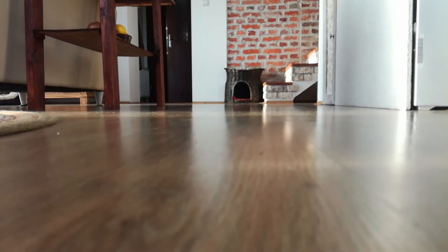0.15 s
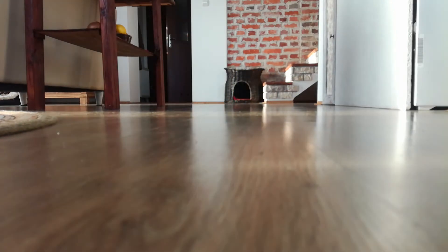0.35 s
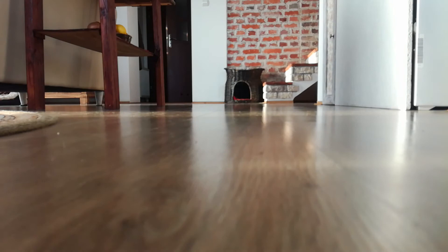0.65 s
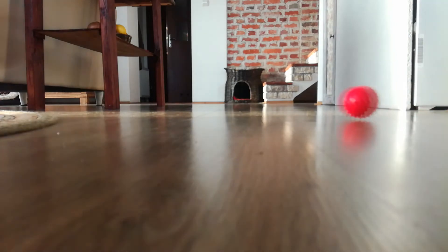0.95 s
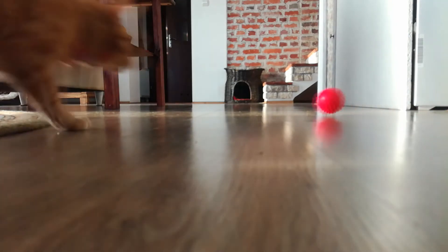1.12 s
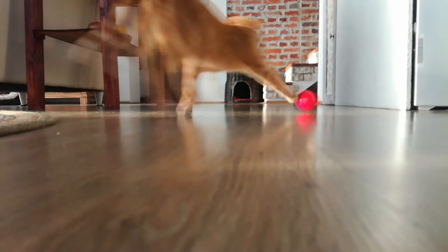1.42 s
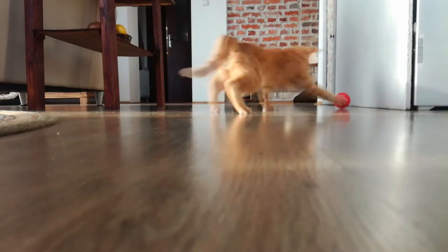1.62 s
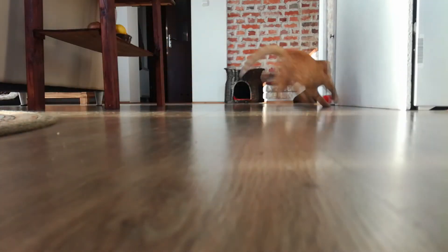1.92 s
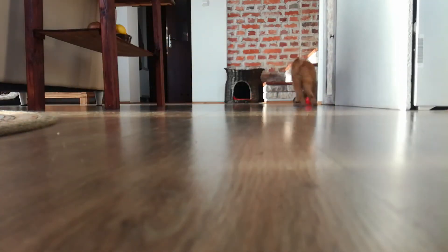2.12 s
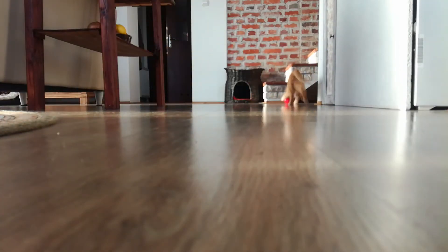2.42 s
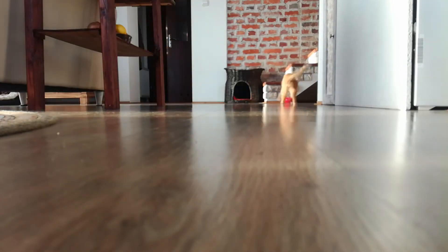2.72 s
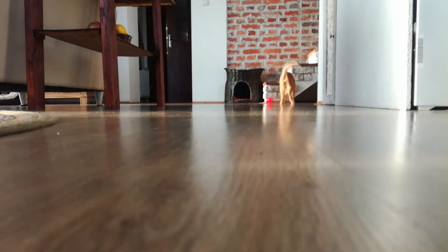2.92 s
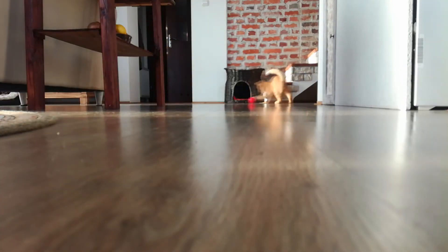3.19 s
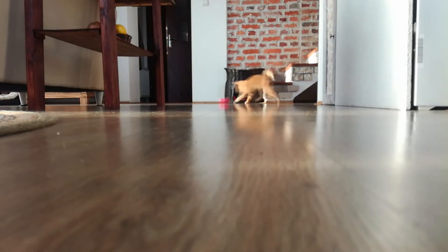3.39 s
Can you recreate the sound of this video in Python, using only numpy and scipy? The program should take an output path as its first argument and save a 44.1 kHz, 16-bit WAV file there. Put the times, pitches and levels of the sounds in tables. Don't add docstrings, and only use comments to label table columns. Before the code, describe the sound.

Hollow plastic ball with knobs clatters rapidly over floorboards, chased by a cat, fading into room echo

```python
import sys
import numpy as np
from scipy import signal
from scipy.fft import rfft, irfft
from scipy.io import wavfile

SR = 44100
rng = np.random.default_rng(int(sys.argv[2]) if len(sys.argv) > 2 else 0)


def volts(x):
    e = np.asarray(x, float) / 20
    return 10 ** e


def transcribe(signal):
    frames = np.atleast_2d(signal).T
    limited = np.clip(frames, -1, 1)
    pcm = np.round(limited * 32767).astype(np.int16)
    wavfile.write(sys.argv[1], SR, pcm)


N = 156555

# start_s, click_peak_db, thud_db, thud_pitch_hz
NEAR_TAPS = [(0.2189, -28.5, -25.5, 634), (0.2438, -35, -34.5, 613), (0.2503, -44, -34.5, 634),
             (0.2716, -43, -31.5, 690), (0.2925, -36, -27.5, 610), (0.3241, -38, -29, 543),
             (0.3305, -39, -46, 513), (0.3434, -37, -31.5, 620), (0.3786, -38, -33.5, 616),
             (0.3876, -27, -28.5, 640), (0.4244, -32.5, -36.5, 616), (0.4554, -33.5, -30.5, 625),
             (0.4917, -36, -32.5, 520), (0.5197, -36, -30.5, 689), (0.5484, -31.5, -27, 517),
             (0.6006, -28, -30, 535), (0.6233, -38, -47.5, 546), (0.6398, -25.5, -34.5, 503),
             (0.6623, -26, -31, 463), (0.7024, -24, -26, 525), (0.7233, -31, -41, 544),
             (0.7425, -31, -25.5, 538), (0.7866, -36, -30, 520), (0.8096, -39, -34, 505),
             (0.833, -29, -33, 533), (0.8788, -35, -33.5, 470), (0.9098, -27.5, -27.5, 480)]
# multiple_of_thud_pitch, level_db, t60_s
THUD_PARTS = [(1.002, 0, 0.018), (1.298, -10, 0.027), (1.8, -15.5, 0.012)]


def in_time(rows):
    s, *columns = np.transpose(rows)
    return [np.interp(np.arange(N) / SR, s, c) for c in columns]


def after_landing():
    return np.arange(N) > NEAR_TAPS[0][0] * SR


def at_hz(points, hz):
    points_hz, points_db = np.transpose(points)
    return np.interp(np.log(hz + 1), np.log(points_hz), points_db)


def colour(x, points, scale=1):
    hz = np.fft.rfftfreq(x.shape[-1], 1 / SR)
    return irfft(rfft(x) * volts(scale * at_hz(points, hz)), x.shape[-1])


def band(x, low_hz, high_hz):
    return signal.sosfilt(signal.butter(2, [low_hz, high_hz], "band", fs=SR, output="sos"), x)


def rms_one(x):
    return x / np.sqrt(np.mean(x ** 2) + 1e-20)


def ring(clicks, hz, t60):
    r, w = volts(-60 / (t60 * SR)), 2 * np.pi * hz / SR
    return signal.lfilter([0, np.sin(w)], [1, -2 * r * np.cos(w), r * r], clicks + 1e-18)


def add(out, s, sound):
    i = int(s * SR)
    out[i:i + len(sound)] += sound[:len(out) - i]


def blow(modes, spread_db, size=2000):
    click = np.zeros(size)
    click[0] = 1
    out = np.zeros(size)
    for hz, db, t60 in modes:
        strength, detune = rng.normal(0, 1, 2)
        out += volts(db + spread_db * strength) * ring(click, hz * (1 + .025 * detune), t60)
    return out


def grains(per_s, uneven_db):
    sizes = volts(uneven_db * np.minimum(rng.exponential(1, N), 4)) * rng.choice([-1, 1], N)
    return sizes * (rng.random(N) < per_s / SR)


def hush():
    # pitch_hz, level_db
    spectrum = [(15, -37), (60, 10.5), (335, 7.5), (714, 3.5), (1500, 4), (2200, -0.5), (9000, -5),
                (15700, -10.5)]
    air = rng.standard_normal((2, N))
    ports = np.array([air[0], .7 * air[0] + .7 * air[1]])
    return volts(-70.5) * rms_one(colour(ports, spectrum))


def stirs():
    # start_s, peak_db, pitch_hz
    catches = [
        (.084, -65.5, 800),
        (.153, -67.5, 1500),
        (0.198, -65, 690),
        (1.697, -35.5, 2220),
        (1.698, -39.5, 2750),
        (3.166, -37.5, 1750),
        (3.249, -40, 1500),
        (3.278, -47, 2220),
    ]
    out = np.zeros(N)
    for s, db, hz in catches:
        add(out, s, volts(db) * blow([(hz, 0, .022), (hz * 1.17, -4, .015)], spread_db=1.0))
    return band(out, 123, 9700)


def taps():
    # start_s, click_peak_db, thud_db, thud_pitch_hz
    mid_taps = [(0.9707, -26, -24, 500), (1.0321, -31.5, -27.5, 584), (1.0914, -34.5, -30.5, 544),
                (1.1317, -31, -32.5, 510), (1.1501, -47, -32, 571), (1.1711, -28.5, -30.5, 520),
                (1.2445, -23.5, -28.5, 550), (1.2735, -29.5, -44, 630), (1.2804, -34, -32, 590),
                (1.3147, -26, -34, 507), (1.3647, -32.5, -30, 528), (1.4077, -44, -39, 563),
                (1.421, -24.5, -34.5, 625), (1.4248, -33, -34, 458), (1.4356, -58, -28.5, 434),
                (1.4707, -32.5, -27.5, 523), (1.4834, -47, -31.5, 674)]
    # start_s, thud_peak_db, thud_pitch_hz, click_db
    far_taps = [(1.604, -38.5, 493, -61), (1.635, -37, 530, -59), (1.673, -36, 575, -63),
                (1.716, -23.5, 396, -76), (1.777, -50, 485, -63), (1.829, -35, 400, -60),
                (1.874, -35, 554, -58), (1.924, -42, 450, -66), (1.961, -36.5, 458, -57),
                (1.997, -38.5, 474, -64), (2.032, -38.5, 463, -54.5), (2.075, -32.5, 456, -60),
                (2.119, -30.5, 454, -54), (2.164, -28.5, 670, -55), (2.23, -21.5, 483, -46),
                (2.273, -24.5, 477, -55), (2.317, -23.5, 510, -50), (2.402, -31.5, 533, -73),
                (2.426, -30, 636, -62), (2.491, -34, 480, -60), (2.505, -30.5, 480, -53),
                (2.521, -27.5, 605, -64), (2.544, -25.5, 720, -55), (2.564, -34, 560, -68),
                (2.585, -31, 412, -62), (2.631, -39, 417, -62), (2.688, -31.5, 384, -57),
                (2.723, -29, 402, -60), (2.828, -40, 395, -62), (2.915, -33, 450, -62),
                (2.934, -33.5, 580, -58), (2.958, -43, 557, -52), (3.004, -30.5, 585, -62),
                (3.029, -27.5, 573, -60), (3.059, -41, 603, -69), (3.087, -35.5, 566, -67),
                (3.109, -35.5, 568, -54), (3.126, -24.5, 587, -54), (3.148, -28, 562, -59),
                (3.169, -37, 565, -55), (3.199, -31.5, 618, -56), (3.274, -35, 650, -42.5),
                (3.301, -31.5, 683, -53), (3.362, -31, 575, -56)]
    # pitch_hz, level_db
    shell = [(700, 13), (1700, 12), (3200, 7.5), (4500, 8.5), (6300, 0.5), (8200, 2), (11000, -9),
             (16000, -14)]
    # pitch_hz, level_db, t60_s
    shell_modes = [(3000, -3, .005), (4250, -2, .005), (5200, -6, .004)]
    thud_gain_db, click_gain_db, shell_ring_db = 3, 2, -9.5
    delay_s, click_s, click_smear = .001, .0009, 2.2
    far = [(s, click_db + 14.5, db - 0.5 - thud_gain_db, hz) for s, db, hz, click_db in far_taps]
    near_thuds, far_thuds = np.zeros((2, N))
    cracks = np.zeros((3, 2, N))
    t = np.arange(300) / SR
    for zone, rows in enumerate([NEAR_TAPS, mid_taps, far]):
        thuds = far_thuds if zone == 2 else near_thuds
        ringing = 2.34 if zone == 2 else 1
        fade = np.exp(-t / (click_s * click_smear ** zone))
        for s, click_db, thud_db, hz in rows:
            thud = blow([(hz * m, db, t60 * ringing) for m, db, t60 in THUD_PARTS], spread_db=1.0)
            add(thuds, s + delay_s, volts(thud_db + thud_gain_db) * thud)
            for port in cracks[zone]:
                puff = rng.standard_normal(len(t)) * fade
                shell_ring = volts(shell_ring_db - 12) * blow(shell_modes, spread_db=5.5, size=300)
                crack = puff / np.linalg.norm(puff) + shell_ring
                add(port, s + delay_s, volts(click_db + click_gain_db) * crack)
    dulled = band(cracks[1], 1700, 6500) + band(cracks[2], 4100 * .7, 4100 * 1.2)
    blunt = band(near_thuds, 102, 1120) + band(far_thuds, 319, 800)
    return band(blunt, 360, 1310) + colour(cracks[0] + dulled, shell)


def roll():
    # time_s, level_db
    rumble = [(.22, -52), (1.52, -40.5), (1.57, -52.5), (2.2, -42.5), (2.35, -38.5), (2.47, -50.5),
              (2.53, -39.5), (2.7, -47), (2.88, -42), (3.18, -42.5), (3.3, -52), (3.55, -44.5)]
    body = np.zeros(N)
    for hz in (440, 560, 680):
        for multiple, db, t60 in THUD_PARTS:
            body += volts(db) * ring(grains(500, 0.72), hz * multiple, t60)
    return volts(in_time(rumble)[0] - 3.5) * rms_one(band(body, 231, 1860)) * after_landing()


def scuffs():
    # time_s, level_db
    strength = [(.22, -80), (.65, -64), (1.22, -64), (1.4, -58.5), (1.425, -55.5), (1.58, -61.5),
                (1.69, -63.5), (1.71, -52.5), (1.9, -63.5), (2.225, -60.5), (2.235, -52.5), (2.45, -58),
                (2.9, -65), (3.0, -54), (3.09, -68), (3.18, -50), (3.3, -55), (3.55, -60)]
    # pitch_hz, level_db
    claw_colour = [(600, -3), (1300, 2), (2500, -11), (4500, -13), (6500, -18), (8100, -17), (10000, -28.5),
                   (16000, -34)]
    grit = rms_one(colour(np.array([grains(3500, 2.5) for _ in range(2)]), claw_colour))
    since_closest_s = np.arange(N) / SR - 1.425
    airy_db = 2.5 + np.minimum(20.5 * since_closest_s, -68 * since_closest_s)
    airy = volts(airy_db) * band(grit, 3730, 15800)
    return volts(in_time(strength)[0] + 3) * (grit + airy) * after_landing()


def paws():
    # time_s, level_db
    weight = [(.2, -70.5), (.6, -59.5), (1.2, -63.5), (1.43, -52.5), (1.55, -65.5), (1.75, -49.5),
              (2.0, -69), (2.2, -64), (2.25, -55), (2.36, -62), (2.95, -63.5), (3.55, -85)]
    # pitch_hz, level_db
    floor_modes = [(84, 0.5), (154, -7.5), (225, 3.5)]
    shake = sum(volts(db) * ring(grains(60, 0.76), hz, 0.035) for hz, db in floor_modes)
    return volts(in_time(weight)[0] - 0.5) * rms_one(band(shake, 80, 265)) * after_landing()


def bell():
    # start_s, length_s, level_db
    shakes = [(0.665, 0.0064, -45), (0.737, 0.006, -51.5), (0.784, 0.011, -57), (1.029, 0.019, -51.5),
              (1.052, .06, -66), (1.207, 0.15, -67.5), (1.348, 0.045, -71), (1.599, 0.084, -70),
              (1.657, 0.062, -70.5), (1.785, 0.063, -64.5), (1.918, 0.16, -63.5), (2.123, 0.22, -67),
              (2.475, 0.074, -65), (2.652, 0.039, -70), (2.892, 0.098, -61), (2.917, 0.32, -67),
              (3.226, 0.079, -65.5), (3.415, 0.026, -52)]
    # pitch_hz, level_db, t60_s
    bell_modes = [(8100, 0, .025), (8230, -3, .022), (7850, -11, .014), (7400, -13, .012),
                  (6950, -14, .012)]
    gain_db, fade_db, pellet_per_s = 6, 4, 1300
    force = np.zeros(N)
    for s, length, db in shakes:
        fading = fade_db * np.linspace(0, 1, int(length * SR))
        add(force, s, volts(db + gain_db - fading))
    hits = [grains(pellet_per_s, 0.91) for _ in range(2)]
    main_hz, _, main_t60 = bell_modes[0]
    steady = ring(hits[0], main_hz, main_t60)
    out = np.zeros(N)
    for k, (hz, db, t60) in enumerate(bell_modes):
        out += volts(db) * ring(force * hits[k % 2], hz, t60)
    return band(out / np.sqrt(np.mean(steady ** 2) + 1e-20), 6400, 9200)


def knocks():
    # start_s, level_db
    hits = [
        (1.699, -17),
        (1.716, -15.5),
        (1.75, -18),
        (1.791, -23.5),
    ]
    # pitch_hz, level_db, t60_s
    panel = [(80, -8.5, 0.12), (155, -5.5, 0.2), (201, -0.5, 0.098), (247.4, -1.5, 0.11), (370, -7.5, 0.11),
             (477, -5, 0.066), (602, -8, 0.079), (987, -9.5, 0.028)]
    out = np.zeros(N)
    for s, db in hits:
        add(out, s, volts(db - 13.5) * blow(panel, spread_db=0.0, size=12000))
    return band(out, 123, 9700)


def room(x):
    # pitch_hz, t60_s
    decay = [(100, 0.28), (500, 0.7), (8000, 0.053), (16000, 0.65)]
    t, tail = np.arange(SR // 2) / SR, 0
    edges = 40 * 2.0 ** np.arange(0, 9.5)
    for low, high in zip(edges, edges[1:]):
        noise = band(rng.standard_normal((2, len(t))), low, high)
        alike = np.clip(170 / low, .2, .97)
        noise[1] = alike * noise[0] + np.sqrt(1 - alike ** 2) * noise[1]
        tail = tail + noise * volts(-60 * t / at_hz(decay, np.sqrt(low * high)))
    first_echo_s = 0.0005
    tail = tail * np.clip(t / first_echo_s - 1, 0, 1)
    return volts(-5.5) * signal.fftconvolve(x[None], tail / np.sqrt(np.sum(tail[0] ** 2)))[:, :N]


def scene():
    # time_s, direct_db, left_over_right_db, right_lag_samples
    distance = [
        (.2, 8.5, 2.5, 18.5),
        (.8, 2, -1.5, 17.5),
        (1.5, 1.5, -3, 6),
        (3.55, -7, -4.5, -5),
    ]
    direct_db, pan_db, lag = in_time(distance)
    dry = stirs() + taps() + roll() + scuffs() + paws() + bell() + knocks()
    late = np.interp(np.arange(N) - lag, np.arange(N), dry[1])
    direct = volts(direct_db) * np.array([dry[0], late * volts(-pan_db)])
    return direct + room(dry[0]) + hush()


def roll_off(x):
    return signal.sosfilt(signal.butter(12, 16790, fs=SR, output="sos"), x)


def record(dry):
    # pitch_hz, left_over_right_db
    muffling = [(60, 8.9), (250, 14.5), (600, 10.5), (1200, 15.4), (2400, 12.8), (4400, 7.7), (8100, 16.5),
                (14000, 10)]
    ports = np.array([dry[0], colour(dry[1], muffling, scale=-1)])
    ports = signal.sosfilt(signal.cheby2(12, 50, 16250, fs=SR, output="sos"), ports)
    return roll_off(volts(6.0) * ports)


dry = scene()
out = record(dry)
transcribe(out)
```